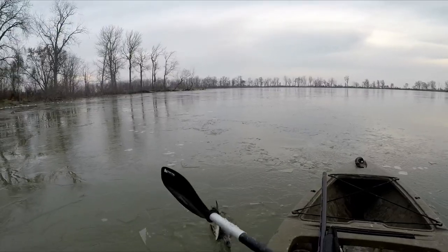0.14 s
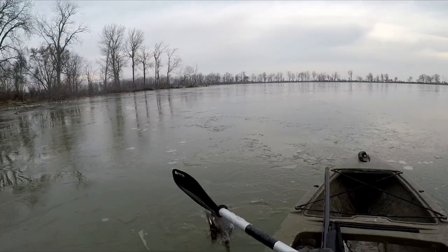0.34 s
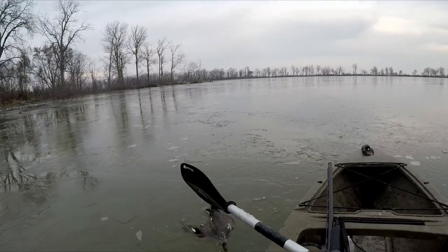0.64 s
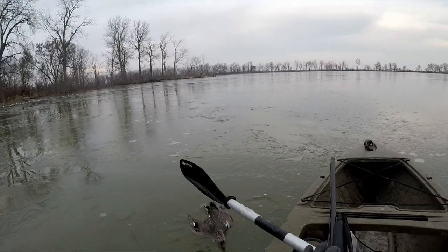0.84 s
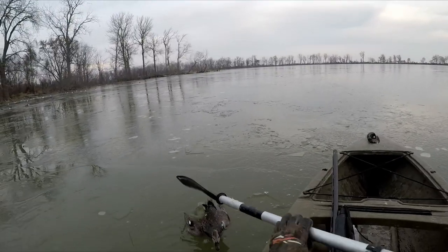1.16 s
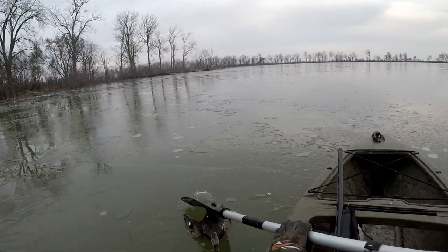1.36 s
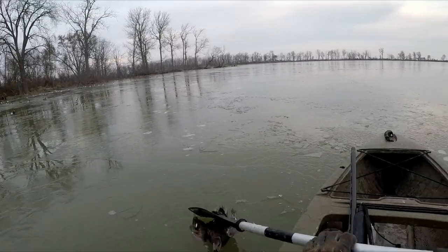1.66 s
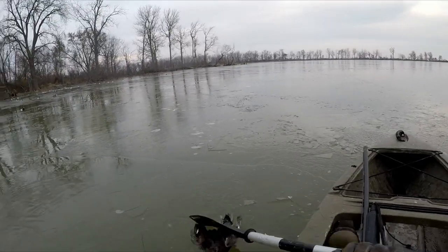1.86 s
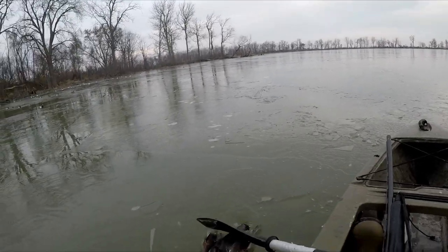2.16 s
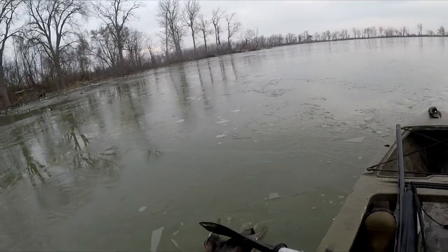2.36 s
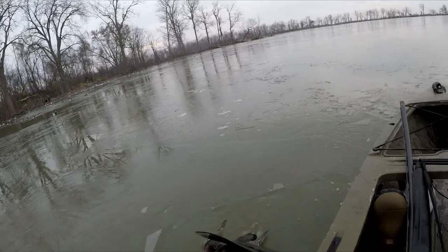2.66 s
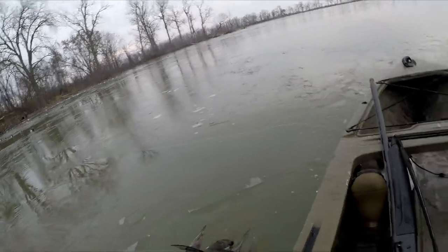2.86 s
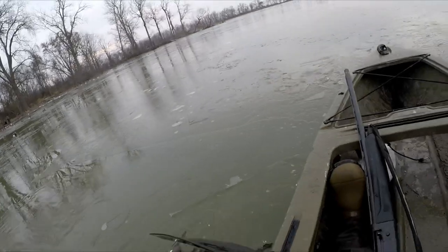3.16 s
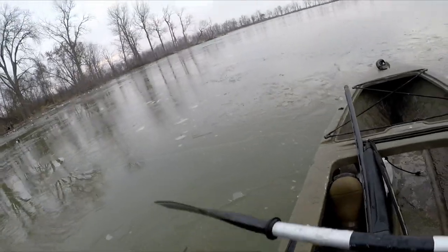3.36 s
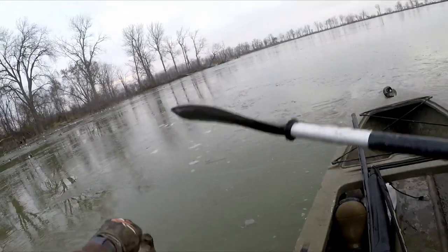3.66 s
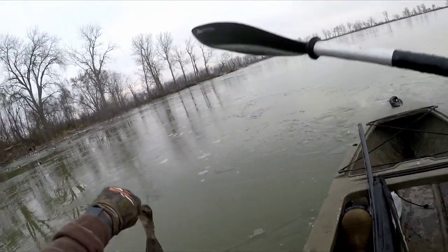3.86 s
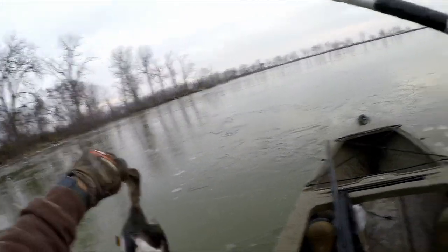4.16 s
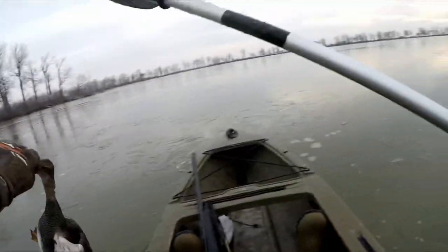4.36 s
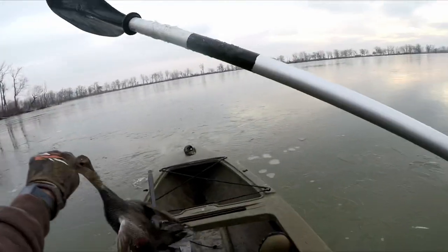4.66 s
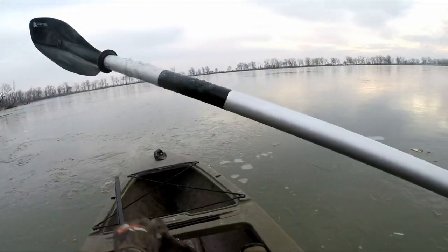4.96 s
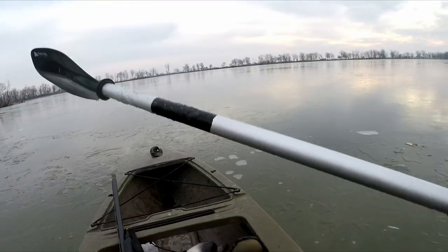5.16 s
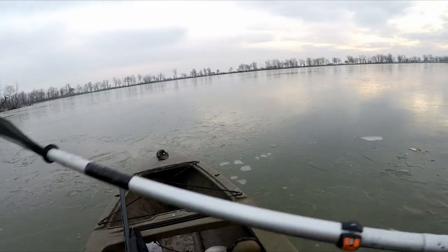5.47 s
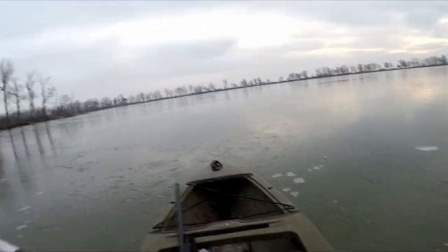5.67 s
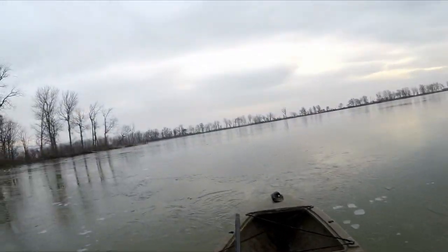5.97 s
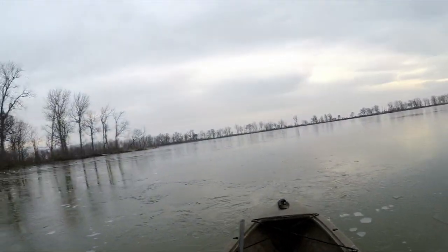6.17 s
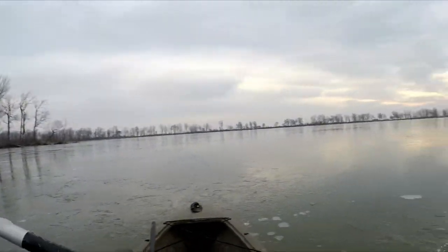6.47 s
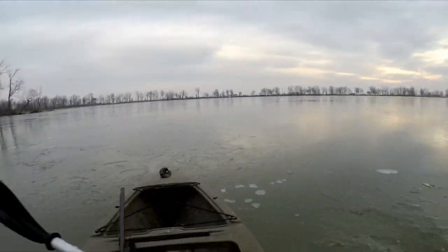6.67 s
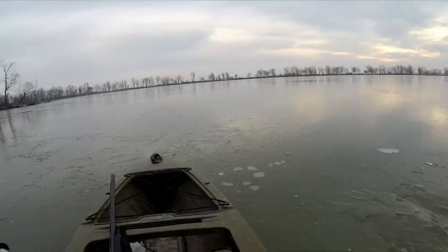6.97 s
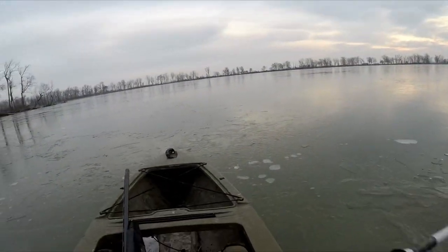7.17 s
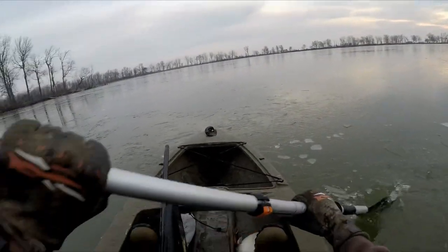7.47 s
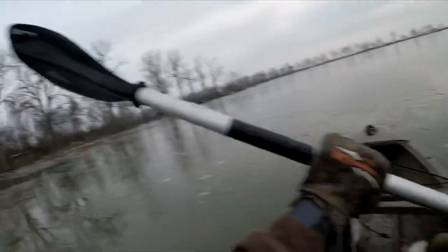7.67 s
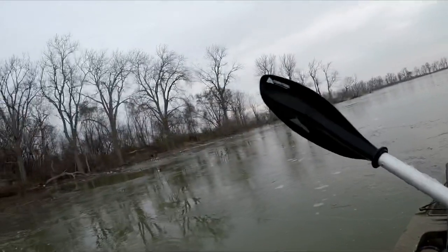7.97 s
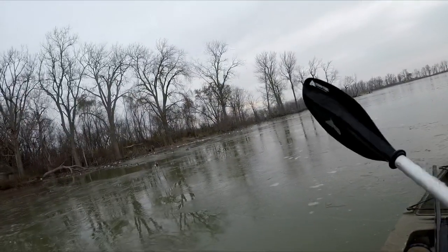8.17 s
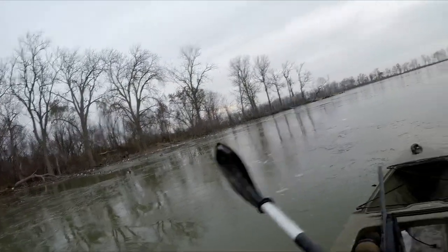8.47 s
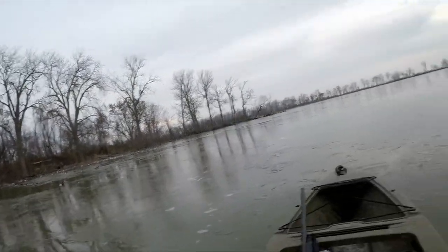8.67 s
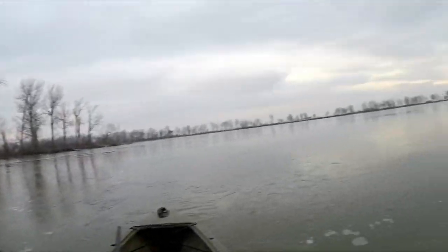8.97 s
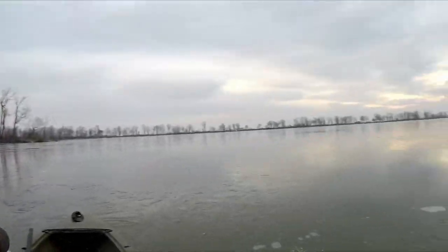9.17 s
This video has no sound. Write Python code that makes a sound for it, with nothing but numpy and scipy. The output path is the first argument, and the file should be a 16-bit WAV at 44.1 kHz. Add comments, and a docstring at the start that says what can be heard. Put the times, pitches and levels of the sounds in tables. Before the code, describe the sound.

On a cold open lake, a plastic kayak drifts through skim ice. Plates knock and grind on its hollow hull, with faint crackle and woody raps. The knocking thins, with one sharp crack and tiny drip notes, until a paddle breaks in with bright, dense crunching and snaps. Knocks then crowd together. Wind rumbles on an on-board stereo microphone, brighter on the right.

```python
"""From the start a plastic kayak drifts through skim ice: plates knock and grind along its drumming hull,
struck modes in two-channel noise, and from 1.3 s edges of ice rap out hollow decaying sines.
After 3.6 s the knocks thin out; near 4.2 s a crack, of filtered noise and a plate's ring, and drop-like notes.
At 6.2 s the paddle breaks in with dense crackle and snaps; more such notes from 7 s, knocks crowd around 8 s.
Wind, lumpy filtered noise, rumbles throughout; the right microphone port is bright, the left one muffled."""
import sys
import numpy as np
from scipy import signal
from scipy.fft import rfft, irfft, next_fast_len
from scipy.io import wavfile
from scipy.ndimage import uniform_filter1d, minimum_filter1d

SR = 44100
rng = np.random.default_rng(int(sys.argv[2]) if len(sys.argv) > 2 else 0)


def unload_wav(signal):
    """Save mono or channel-first audio to the path in sys.argv[1] as 16-bit WAV at rate SR, clipped to [-1, 1]."""
    wavfile.write(
        sys.argv[1],
        SR,
        np.round(np.clip(np.atleast_2d(signal).T, -1, 1) * 32767).astype(np.int16),
    )


N = 411012
HZ = np.fft.rfftfreq(next_fast_len(N + 8192), 1 / SR)

# The modes of the plastic hull: (frequency [Hz], level under the hail [dB], undamped ring time t60 [s])
HULL_MODES = [(90, -1.5, 0.027), (115.7, -3, 0.17), (154.4, 1.5, 0.09), (189.2, 0.5, 0.12),
              (234.2, 1.5, 0.097), (289, -4, 0.11), (337.3, -9.5, 0.087), (396, 3.5, 0.027),
              (498, 0.5, 0.042), (594.8, -1.5, 0.038), (679, -11, 0.038), (793, -25.5, 0.019)]
UPPER_HZ = 385  # modes above this count as upper
# Single plates hitting the hull: (time [s], level [dB], upper modes against it [dB], struck panel [Hz])
KNOCKS = [(0.294, -5, -12, 184), (0.459, -4, -25, 134), (0.51, -6, -33, 155), (1.322, -12, 7, 148),
          (1.353, -10, 1, 282), (1.394, -7, -5, 207), (1.507, -18, 6, 145), (1.589, -23, -2, 292),
          (1.63, -22.5, 13, 290), (1.699, -7, -9, 247), (1.723, -4, 0, 233), (1.898, -3, -22, 242),
          (2.13, -3, -28, 234), (2.423, 2, -28, 190), (2.545, 1.5, -28, 220), (2.803, 1.5, -9, 176),
          (2.841, -1, -5, 235), (3.069, 0, -7, 226), (3.114, 6.5, -8, 228), (3.212, -10, 1, 230),
          (3.24, -13, 2, 159), (3.355, -13, -23, 178), (3.411, -11, -27, 273), (3.46, -14, -27, 209),
          (3.567, -10.5, 0.5, 157), (3.739, -5, -11, 226), (4.178, -18, -14, 164), (4.754, -30, -33, 213),
          (5.097, 1.5, -6, 234), (5.345, 0, -4, 241), (5.768, -21, 15, 286), (6.742, -4, -10, 178),
          (7.444, -16, -6, 270), (7.684, -3, 1, 183), (7.705, -5.5, -25, 203), (7.83, -9, -29, 198),
          (7.874, -2.5, -27, 177), (7.93, -4, -25, 141), (7.971, -9, -25, 111), (7.985, -4, -25, 280),
          (8.006, -1, -25, 124), (8.062, -8, -25, 117), (7.912, -8.5, 3, 154), (8.178, -1, -25, 189),
          (8.193, -17, -2, 259), (8.348, -10, -25, 198), (8.505, -21, -7, 200), (8.547, -8.5, -4, 273),
          (9.15, 3.5, -5, 206)]
CONTACT_S = 0.014  # a plate stays on the hull this long, so that each mode swells before it dies
PANEL_DB_PER_OCTAVE = 28  # modes away from the struck panel ring less
KNOCK_UNEVEN = 0.32  # a hard blow evens out the upper modes: share of their dB pattern left
KNOCK_DAMPING = 0.75  # the plate rests on the hull and shortens its ring to this share
# Changing level of drumming, crackle and crunch under the single events:
# (time [s], lower hull modes [dB], upper hull modes [dB], crackle [dB], crunch [dB])
UNDERLAY = [(0, -19, -30.5, -49.5, -42.5), (.6, -18.5, -26.5, -47.5, -39.5), (1.05, -22.5, -32, -50.5, -45),
            (1.6, -21, -27.5, -48.5, -41.5), (2.5, -16, -30, -49.5, -42.5), (2.95, -20.5, -29, -50, -42.5),
            (3.3, -24, -36, -48.5, -41.5), (3.65, -23.5, -38.5, -49.5, -43), (4.4, -24, -30, -52.5, -46.5),
            (5.0, -21, -28.5, -50.5, -45), (5.5, -24.5, -39, -57, -52), (6.23, -28, -31.5, -54.5, -45.5),
            (6.26, -18.5, -29, -27.5, -32), (6.9, -22.5, -26, -36, -35), (7.4, -26.5, -30, -43.5, -41.5),
            (7.6, -18, -27.5, -39.5, -35), (8.2, -19, -18.5, -37.5, -31.5), (8.95, -16, -26.5, -42, -38),
            (9.32, -29, -16, -35, -30)]
# The hull rides up on a sheet and grinds along it:
# (start [s], hold [s], lower modes [dB], upper modes [dB])
SHOVES = [(.29, 0.11, -17.5, -26), (.45, 0.14, -15.5, -35), (.7, 0.073, -15, -23.5),
          (1.2, 0.037, -13.5, -26), (1.32, 0.17, -27, -28), (1.49, 0.18, -39, -26), (1.69, 0.11, -15, -37),
          (1.89, 0.027, -16, -22.5), (2.0, 0.17, -16, -25), (2.33, 0.15, -16, -25.5),
          (2.55, 0.19, -10, -24), (2.79, 0.082, -15.5, -29), (3.05, .27, -11, -25),
          (3.43, 0.099, -17, -30.5), (3.72, 0.11, -22, -37), (3.86, 0.1, -12.5, -37),
          (4.17, 0.034, -16, -43), (5.15, 0.087, -12.5, -29.5), (6.08, 0.031, -24, -45),
          (6.255, 0.32, -21, -21.5), (6.46, .16, -17, -17), (6.64, 0.064, -26, -26),
          (6.73, 0.034, -15, -27), (6.77, 0.033, -11.5, -23), (6.91, 0.077, -36, -29.5),
          (7.455, 0.12, -19.5, -24), (7.683, 0.025, -11, -19.5), (7.8, 0.12, -10, -21.5),
          (7.94, 0.17, -10, -20.5), (8.17, 0.22, -14, -32), (8.5, 0.17, -16, -35), (8.85, 0.16, -13, -28),
          (9.05, 0.38, -11, -23.5)]
SHOVE_ATTACK_S, SHOVE_T60_S = 0.012, 0.29
SWELL_SHARE, SWELL_MOST_S = .4, .035  # a run's attack is longer by this share of its hold, up to a limit

# The struck panel's own thump starts sharp by PANEL_SAG, a share of its pitch, and settles
PANEL_DB, PANEL_SAG, PANEL_SAG_S, PANEL_T60_S = -5.5, 0.11, 0.0068, 0.058
PANEL_HOLD_S = 0.011  # the plate presses on this long before the thump dies
# Edges of ice rap a small panel, which rings hollow: (time [s], level [dB], pitch [Hz], t60 [s])
RAPS = [(1.322, -16, 664, 0.064), (1.357, -12, 670, 0.1), (1.395, -21, 600, .06), (1.509, -15.5, 507, 0.13),
        (1.547, -14, 560, 0.057), (1.6, -13.5, 549, 0.18), (1.612, -18.5, 790, .04), (1.64, -17, 511, .12),
        (1.699, -12, 502, 0.1), (1.715, -14, 605, 0.18), (2.804, -8.5, 594, 0.053),
        (2.842, -20, 614, 0.076), (3.212, -23, 446, .07), (3.238, -16.5, 673, 0.09), (5.062, -26, 597, .09),
        (5.098, -9, 554, 0.041), (5.185, -13.5, 461, 0.21), (5.342, -16, 750, 0.053), (5.35, -17, 605, 0.1),
        (5.385, -22, 520, 0.054), (6.298, -24, 606, .06), (6.415, -10.5, 510, .07), (6.48, -21, 600, .07),
        (6.52, -14, 565, 0.087), (6.555, -22, 527, 0.061), (6.59, -7, 546, .1), (6.745, -21, 630, .07),
        (6.95, -16, 494, .06), (7.48, -13, 543, 0.035), (7.575, -21, 520, .07), (7.697, -14, 593, 0.043),
        (7.913, -11, 530, 0.11), (8.16, -16, 510, 0.079), (8.195, -15, 470, .08), (8.506, -20, 600, .06),
        (8.546, -19, 610, 0.051), (9.151, -27, 552, 0.063)]
RAP_RISE_S = 0.0013

# Runs of fractures; the long loud ones are the paddle breaking in:
# (start [s], hold [s], crackle [dB], crunch [dB])
BREAKS = [(.05, 0.04, -42.5, -35.5), (.33, 0.082, -49, -39.5), (.52, 0.027, -48, -49),
          (1.17, 0.059, -51, -42), (1.265, 0.014, -47, -52), (1.32, 0.0074, -34, -42),
          (1.35, 0.0045, -33, -44), (1.48, 0.067, -45.5, -39), (1.57, 0.07, -47.5, -37.5),
          (1.69, 0.033, -41, -32), (1.77, 0.026, -42.5, -37), (1.885, 0.039, -40.5, -34),
          (2.0, 0.15, -46, -38), (2.32, 0.093, -52, -40), (2.45, 0.092, -43.5, -38),
          (2.54, 0.095, -37, -34), (2.655, 0.081, -40.5, -33.5), (2.75, 0.12, -44, -39.5),
          (3.04, 0.032, -42, -33), (3.09, 0.087, -38.5, -34), (3.2, 0.092, -37, -31),
          (3.39, 0.023, -43, -43), (3.447, 0.074, -43, -37.5), (3.86, 0.081, -45.5, -39.5),
          (4.177, 0.0058, -43, -21.5), (4.22, 0.041, -46, -48), (4.285, .012, -46, -39),
          (4.32, 0.029, -50, -40), (4.525, 0.0056, -63, -36.5), (4.6, 0.014, -63, -41),
          (5.04, 0.067, -46, -38), (5.16, 0.058, -46, -36.5), (5.29, 0.046, -48.5, -48),
          (5.345, 0.0091, -58, -40), (5.765, 0.021, -43.5, -46), (6.05, 0.036, -49.5, -49),
          (6.241, 0.014, -19.5, -20.5), (6.265, 0.36, -24, -22), (6.63, 0.054, -51, -32),
          (6.68, 0.18, -28.5, -31), (6.73, 0.029, -29, -38), (6.89, .13, -33.5, -38),
          (7.03, 0.039, -37, -31), (7.22, 0.013, -51, -36), (7.443, 0.016, -26, -20.5),
          (7.465, 0.038, -34.5, -26), (7.5, 0.073, -37, -36), (7.565, 0.024, -50, -32.5),
          (7.69, 0.0088, -40, -29), (7.74, 0.052, -38, -33), (7.8, 0.048, -34.5, -31.5),
          (7.9, 0.25, -36, -31.5), (8.25, 0.042, -38, -36), (8.33, 0.021, -40, -34),
          (8.42, 0.018, -54, -36), (8.5, 0.037, -41, -49), (8.6, 0.11, -38, -36), (8.76, 0.07, -41, -38),
          (8.86, 0.034, -55, -37), (8.996, 0.0077, -30, -28), (9.02, 0.028, -30, -36),
          (9.055, 0.14, -32, -27), (9.2, 0.069, -38.5, -39)]
BREAK_ATTACK_S, BREAK_T60_S = 0.00076, 0.071
# Colour of the bright crackle: (frequency [Hz], level per Hz [dB])
CRACKLE_COLOUR = [(1300, -1.5), (2200, -23), (2600, -10), (3400, -7), (4200, -11), (5000, -9.5),
                  (6200, -7.5), (7000, -6.5), (7600, -4.5), (8400, -9), (10000, -14), (12100, -23.5),
                  (14200, -30), (15500, -42)]
# Colour of the duller crunch: (frequency [Hz], level per Hz [dB])
CRUNCH_COLOUR = [(400, -36), (700, 9), (1000, 10), (1500, 6), (2000, -1), (2800, -7.5), (4000, -43.5)]
QUIET_DB = -50  # a quiet crackle, from which its growth is counted
HISS_GROWTH = -.02  # dB of hiss per dB of growth: loud breaking is a little grainier
TOP_HZ, TOP_FROM_DB = 10500, 9  # beyond this growth the crackle's top band grows less than the rest
TOP_DB, TOP_LOSS = 3.5, 0.92  # gain of the top band in a quiet crackle; dB lost per dB of further growth
GURGLE_DB, GURGLE_GROWTH = -10.5, .3  # bubbles against a quiet crunch; dB gained per dB of growth

# Single cracks: (time [s], level [dB], crunch against it [dB], plate pitch [Hz], edge against it [dB])
SNAPS = [(0.0643, -44, -17, 1410, -20), (0.3436, -31, -23, 1060, -25), (0.543, -26, -18, 1360, -27),
         (1.003, -36, -10, 1300, -8), (1.1, -31.5, -10, 910, -16), (1.1888, -29.5, -11, 1100, -21),
         (1.267, -33, -8, 910, -25), (1.3205, -25, -4, 1740, -10), (1.3523, -24.5, -1, 1474, -11),
         (1.3618, -45, -1, 1600, -12), (1.435, -49, 11, 1120, 1), (1.5204, -31, -19, 910, -10),
         (1.695, -35, -2, 1380, -9), (1.719, -31.5, -2, 1405, -21), (2.0076, -23.5, -6, 1100, -16),
         (2.0408, -22.5, -9.5, 1450, -27), (2.0615, -30, -13, 1100, -25), (2.225, -33, -6, 1000, -20),
         (2.301, -40, -19, 1000, -18), (2.378, -35, -18, 1000, -22), (2.4199, -32.5, -11, 1000, -20),
         (2.46, -30, -18, 1000, -25), (2.5735, -38, -10, 894, -22), (2.5888, -21, -17, 1460, -28),
         (2.6567, -26, -11, 996, -23), (2.782, -33, -14, 1090, -12), (2.948, -44, -14, 1010, -22),
         (3.0944, -29, -16, 1160, -19), (3.1069, -26, 0, 1070, -26), (3.2135, -26, -11, 1290, -27),
         (3.261, -32, -3, 991, -26), (3.333, -32, -8, 1000, -20), (3.352, -33, -16, 1100, -24),
         (3.391, -44, -14, 1200, -24), (3.464, -23.5, -10.5, 1410, -19), (3.497, -25, -10, 1030, -20),
         (3.87, -32, -3, 1430, -13), (4.176, -14.5, -19, 1350, -11), (4.526, -46, -12, 2200, 2),
         (4.8208, -40.5, -3, 925, -9), (5.071, -30, -14, 1060, -10), (5.1621, -26, -24, 1050, -17),
         (5.4923, -47, -6, 950, -1.5), (5.768, -30, -5, 1060, -26), (5.922, -36.5, -15, 930, -25),
         (6.2402, -8, -11.5, 1290, -14), (6.2957, -11, -6.5, 1150, -26), (6.341, -11, -17, 1000, -26),
         (6.386, -11, -17, 950, -29), (6.405, -19, -18, 1100, -26), (6.4435, -14, -9, 964, -28),
         (6.54, -13, -16, 1080, -25), (6.575, -6, -20, 925, -22), (6.694, -11, -20, 1140, -35),
         (6.724, -19, -14, 1030, -28), (6.733, -25, -6, 870, -22), (6.746, -18.5, -2.5, 970, -24),
         (6.77, -14, -18, 1180, -25), (6.8578, -7.5, -38, 1430, -38), (6.8934, -23, -27, 902, -17),
         (6.921, -19, -16, 1550, -23), (6.945, -16.5, -13, 1390, -27), (6.968, -17.5, -28, 1250, -34),
         (7.08, -23, -27, 982, -29), (7.1501, -25, -10, 880, -27), (7.178, -28, -20, 1000, -27),
         (7.204, -27, -20, 1000, -27), (7.2204, -18.5, -16, 1100, -37), (7.442, -10, -17.5, 1880, -14),
         (7.753, -20, -18, 990, -15), (7.8133, -14, -16, 940, -33), (7.961, -23, -9, 1010, -26),
         (8.0251, -17, -6.5, 906, -29), (8.077, -14.5, -13, 940, -23), (8.2684, -19.5, -7.5, 1030, -31),
         (8.434, -27, -25, 1000, -25), (8.5083, -10, -34, 966, -27), (8.6864, -28, -13, 1010, -22),
         (8.727, -21, -20, 900, -26), (8.769, -26, -14, 960, -21), (8.9945, -8.5, -18.5, 1310, -19),
         (9.026, -15, -9, 970, -23), (9.0478, -30, -10, 1550, -6), (9.0676, -22, -5, 1040, -11),
         (9.115, -9, -28, 1020, -23), (9.154, -24, -9, 880, -19)]
# Colour of the tick and its tail: (frequency [Hz], level per Hz [dB])
SNAP_COLOUR = [(3000, -73), (4800, -16.5), (7500, -4.5), (10000, -13), (12500, -30), (15000, -27)]
# Colour of the duller body of a crack: (frequency [Hz], level per Hz [dB])
BODY_COLOUR = [(300, -9), (600, 11.5), (1000, 0.5), (1700, -3.5), (2400, -8), (3600, -31), (8000, -53)]
# Colour of the edge of a crack: (frequency [Hz], level per Hz [dB])
EDGE_COLOUR = [(900, -55), (1500, 5), (2600, -3), (3600, -5), (4500, -5), (6500, -22), (12000, -46)]
SNAP_T60_S, SNAP_RISE_S = 0.014, 0.0017
EDGE_LASTS, PLATE_LASTS = 1.16, 2.65  # edge and plate ring last this many times the noisy tail
SNAP_EDGE_DB = 23
CLICK_DB = 12.5  # the first instant of a crack against its noisy tail
OVERTONE, OVERTONE_DB = 2.3, -21.5  # second mode of a plate: frequency ratio and level
# The cleanest splits also give a bare, very high click: (time [s], level before PING_DB [dB])
PINGS = [(1.3218, -32), (1.3512, -34), (4.1758, -35), (6.2401, -31), (6.8562, -26), (7.2209, -31),
         (7.4425, -26), (8.4332, -37), (8.5065, -32), (8.9939, -29), (9.1142, -16)]
PING_HZ, PING_DB = 10000, 9

# Short decaying notes, some rising in pitch, like drops and bubbles:
# (time [s], level [dB], start pitch [Hz], rise [octaves], t60 [s])
DROP_NOTES = [(4.122, -38, 2840, 1.3, 0.017), (4.259, -27, 5900, .1, 0.01), (4.355, -22, 7360, .1, 0.0064),
              (4.526, -19, 1310, .05, 0.018), (7.01, -21, 1500, .1, .04), (7.012, -18, 870, .05, .04),
              (7.064, -24, 1800, .1, .03), (7.068, -28, 1300, .05, .04), (7.466, -24, 1300, .1, 0.04),
              (7.478, -19, 1320, .05, .035), (7.485, -11.5, 1030, 0.05, 0.033),
              (7.575, -24, 1510, .1, 0.036), (7.729, -23, 1740, .2, .03), (7.731, -25, 2530, .1, 0.028),
              (7.736, -20, 2170, .15, 0.032), (7.74, -27, 2420, .1, 0.024)]
# Gusts on the ports: (time [s], rumble [dB])
WIND = [(0.0, -18.5), (0.1, -17.5), (0.21, -30), (0.26, -19), (0.98, -15), (2.65, -22.5), (3.27, -13.5),
        (3.32, -24), (3.6, -12), (3.63, -16), (5.06, -12), (5.14, -17), (5.19, -17), (6.02, -10),
        (6.85, -15), (7.24, -16.5), (7.27, -10), (7.94, -23.5), (8.18, -11), (8.77, -28.5), (8.95, -12),
        (9.32, -25)]
# Colour of the wind rumble: (frequency [Hz], level per Hz [dB])
WIND_COLOUR = [(15, -1), (28, -1.5), (45, -3), (70, -3.5), (100, -9), (200, -19.5), (500, -34),
               (1500, -69.5), (5000, -79.5)]

# Tone of the two ports: (frequency [Hz], left minus right [dB])
PORTS = [(30, 0.4), (140, -1.5), (320, -1.5), (500, -5.5), (720, -8), (1050, -2), (1700, -5.5),
         (2600, -0.5), (3900, -2), (4800, -11), (5500, -15), (7700, -25), (9300, -17), (12000, -18),
         (15000, -22)]
# Phase between the ports: (frequency [Hz], lead of the left port [radians])
LEAD = [(0, 0), (350, -.25), (520, 0), (850, 2.0), (1100, 2.3), (2700, 2.55), (3500, 1.0), (4500, 1.1),
        (5000, 3.1), (7000, 0), (9000, -3.1), (11000, -9), (14000, -16)]
# Likeness of the ports: (frequency [Hz], likeness [0-1])
ALIKE = [(30, .985), (100, .955), (300, .93), (500, .96), (1100, .97), (1700, .89), (2600, .79), (3900, .5),
         (5500, .62), (7700, .2), (9300, .5), (12000, .2)]
CUTOFF_HZ = 15800
LIMIT_DB, RELEASE_DB_PER_S = -1, 50


def hull():
    """A hail of plates and single large ones strike the hull modes, each with new strengths."""
    drum_gain, upper_gain = swells(SHOVES, SHOVE_ATTACK_S, SHOVE_T60_S, in_time(UNDERLAY)[:2])
    hail = grains(500.0, spread_db=2.0, clump_db=1.0, clump_rate=22.0)
    s, level_db, knock_upper_db, panel_hz = np.transpose(KNOCKS)
    touch = np.arange(int(CONTACT_S * SR))
    at = (s * SR).astype(int)[:, None] + touch
    push = np.exp(-3 * touch / len(touch))
    lower, upper, knocks = np.zeros((3, 2, N))
    for hz, mode_db, t60 in HULL_MODES:
        drumming = from_db(mode_db) * ring(hail * rng.standard_normal((2, N)), hz, t60)
        start = rng.normal(0, .6, (len(at), 1))  # phases: the modes start nearly together
        strength = from_db(level_db + rng.normal(0, 1.0, (len(at), 2)).T)[..., None]
        blow = strength * 2 * push / push.sum() * np.cos(2 * np.pi * hz * touch / SR + start)
        if hz > UPPER_HZ:
            upper += drumming
            # the upper modes take mostly the first of the contact
            blow *= from_db(knock_upper_db + KNOCK_UNEVEN * mode_db - 0.5)[:, None] * push
        else:
            lower += drumming
            # modes near the struck panel ring most
            octaves_off = np.abs(np.log2(hz / panel_hz))
            blow *= from_db(-9.5 - PANEL_DB_PER_OCTAVE * octaves_off)[:, None]
        blows = np.zeros((2, N))
        blows[:, at] = blow
        knocks += ring(blows, hz, KNOCK_DAMPING * t60)
    grind = drum_gain * evened(lower, 0.084, 0.36) + upper_gain * evened(upper, 0.013, 0.14)
    soft = signal.butter(4, 1000.0, fs=SR, output="sos")  # wet ice on plastic is a soft contact
    return signal.sosfilt(soft, grind + knocks)


def thumps():
    """The panel under each blow rings at its own pitch, which sags as the hull springs back."""
    out, after = np.zeros(N + SR), np.arange(SR // 6) / SR
    for s, level_db, _, panel_hz in KNOCKS:
        pitch = panel_hz * (1 + PANEL_SAG * np.exp(-after / PANEL_SAG_S))
        fall_db = 60 * np.maximum(after - PANEL_HOLD_S, 0) / PANEL_T60_S
        envelope = from_db(level_db + PANEL_DB - fall_db) * np.minimum(after / 0.0046, 1)
        i = int(s * SR)
        out[i:i + len(after)] += envelope * np.sin(2 * np.pi * np.cumsum(pitch) / SR)
    return out[:N]


def raps():
    """An edge of ice on a small panel: one short hollow note, a decaying sine."""
    out, after = np.zeros(N + SR), np.arange(SR // 6) / SR
    for s, level_db, hz, t60 in RAPS:
        envelope = from_db(level_db - 60 * after / t60) * np.minimum(after / RAP_RISE_S, 1)
        i = int(s * SR)
        out[i:i + len(after)] += envelope * np.sin(2 * np.pi * hz * after)
    return out[:N]


def ice():
    """Every fracture is a short noise burst and a ring, heard as a bright crackle and a duller, longer crunch."""
    crackle_gain, crunch_gain = swells(BREAKS, BREAK_ATTACK_S, BREAK_T60_S, in_time(UNDERLAY)[2:])
    white = rng.standard_normal((2, 2, N))
    fractures = grains(600.0, spread_db=2.5, clump_db=1.5, clump_rate=19.0)
    growth_db = 20 * np.log10(uniform_filter1d(crackle_gain, size=SR // 5)) - QUIET_DB
    hiss = 2.6 * from_db(HISS_GROWTH * growth_db)  # far and tiny fractures merge

    bursts = evened(white[0] * (hiss + dying(fractures, 0.021)), 0.092, 0.92)
    tinkle = rms_one(shards(fractures, 3000.0, 13100.0, cycles=27.0, tilt=-2.8))
    tinkle_gain = from_db(-10.0 + 0.05 * growth_db)
    crackle = rms_one(colour(bursts + tinkle_gain * tinkle, CRACKLE_COLOUR))
    top = signal.sosfilt(signal.butter(4, TOP_HZ, "high", fs=SR, output="sos"), crackle)
    rest = signal.sosfilt(signal.butter(4, TOP_HZ, fs=SR, output="sos"), crackle)
    top_db = TOP_DB - TOP_LOSS * np.maximum(growth_db - TOP_FROM_DB, 0)
    crackle = rest + from_db(top_db) * top

    crunch = evened(colour(white[1] * (hiss + dying(fractures, 0.041)), CRUNCH_COLOUR), 0.1, 0.65)
    clink = rms_one(shards(fractures, 700.0, 2730.0, cycles=11.0, tilt=0.88))
    # air trapped as water wells up between the pieces
    pockets = grains(150.0, spread_db=3.5, clump_db=4.0, clump_rate=12.0)
    bubbles = rms_one(shards(pockets, 410.0, 1230.0, cycles=11.0, tilt=1.8))
    gurgle = from_db(GURGLE_DB + GURGLE_GROWTH * growth_db) * bubbles
    return crackle_gain * crackle + crunch_gain * (crunch + from_db(-5.5) * clink + gurgle)


def snaps():
    """A sharp tick with a noisy tail and edge, a duller crunch and the brief ring of the plate that split."""
    white = rng.standard_normal((2, 2, N))
    tails, clicks, edges, bodies, plates = np.zeros((5, N))
    time = np.arange(SR // 10) / SR
    for s, level_db, crunch_db, hz, edge_db in SNAPS:
        i = int(s * SR)
        after = time[:N - i]
        span = slice(i, i + len(after))
        rise = np.minimum(after / SNAP_RISE_S, 1)
        fall_db = 60 * after / SNAP_T60_S
        tails[span] += from_db(level_db - fall_db)
        clicks[i] = from_db(level_db + CLICK_DB)
        edges[span] += rise * from_db(level_db + edge_db - fall_db / EDGE_LASTS)
        bodies[span] += rise * from_db(level_db + crunch_db - fall_db / 4.8)
        note = np.sin(2 * np.pi * hz * after)
        note += from_db(OVERTONE_DB) * np.sin(2 * np.pi * OVERTONE * hz * after)
        plates[span] += rise * from_db(level_db + crunch_db - fall_db / PLATE_LASTS) * note
    tick = from_db(9.5) * colour(white[0] * tails + clicks, SNAP_COLOUR)
    edge = from_db(SNAP_EDGE_DB) * colour(white[1] * edges, EDGE_COLOUR)
    body = from_db(16.0) * colour(white[0] * bodies, BODY_COLOUR)
    return tick + edge + body + from_db(12.0) * plates


def pings():
    """The cleanest splits: single clicks with only their top left."""
    clicks = np.zeros(N)
    s, level_db = np.transpose(PINGS)
    clicks[(s * SR).astype(int)] = from_db(level_db + PING_DB)
    return signal.sosfilt(signal.butter(2, PING_HZ, "high", fs=SR, output="sos"), clicks + 1e-18)


def drop_notes():
    """Short decaying sines, some rising in pitch, like drops and bubbles."""
    out, after = np.zeros(N), np.arange(SR // 16) / SR
    for s, level_db, hz, rise, t60 in DROP_NOTES:
        pitch = hz * 2 ** (rise * np.minimum(after / t60 * 2, 1))
        envelope = from_db(level_db - 60 * after / t60) * np.minimum(after / 0.0011, 1)
        i = int(s * SR)
        out[i:i + len(after)] += envelope * np.sin(2 * np.pi * np.cumsum(pitch) / SR)
    return out


def wind():
    """Lumpy turbulence on the ports: low noise, separate in each channel, under a curve of gusts."""
    rumble_db, = in_time(WIND)
    lumps = from_db(0.58 * drift(5.5))
    turbulence = lumps * colour(rng.standard_normal((2, N)), WIND_COLOUR)
    return from_db(rumble_db) * evened(turbulence, 0.053, 0.16)


def shards(fractures, low_hz, high_hz, cycles, tilt):
    """Loose pieces of ten sizes: each fracture rings one of them per channel for a few cycles."""
    pitches = np.geomspace(low_hz, high_hz, 10)
    dealt = rng.integers(0, 10, (2, N))
    return sum(ring(fractures * (dealt == k), hz, cycles / hz) * (low_hz / hz) ** tilt
               for k, hz in enumerate(pitches))


def grains(per_s, spread_db, clump_db, clump_rate):
    """Random clicks, many small and few large, that come in clumps."""
    born = rng.random(N) < per_s * from_db(clump_db * drift(clump_rate)) / SR
    return born * from_db(spread_db * np.minimum(rng.exponential(1, N), 4))


def swells(rows, attack_s, t60, under_db):
    """Attack, hold, release for each row, its power added to the level underneath; gains for two layers."""
    power, time = from_db(under_db) ** 2, np.arange(N) / SR
    for start, hold, *db in rows:
        swell = min(SWELL_SHARE * hold, SWELL_MOST_S)
        i, j = int((start - swell / 2) * SR), int((start + hold + t60) * SR)
        after = time[i:j] - start
        attack = np.clip((after + swell / 2) / (attack_s + swell), 0, 1)
        release = from_db(-60 * np.maximum(after - hold, 0) / t60)
        power[:, i:j] += (from_db(db)[:, None] * attack * release) ** 2
    return np.sqrt(power)


def ring(clicks, hz, t60):
    """Two-pole resonator: a unit click sets a decaying sine of height 1 ringing."""
    r, w = from_db(-60 / (t60 * SR)), 2 * np.pi * hz / SR
    return signal.lfilter([0, np.sin(w)], [1, -2 * r * np.cos(w), r * r], clicks + 1e-18)


def dying(clicks, t60):
    """Each click leaves an envelope that falls 60 dB in t60."""
    return signal.lfilter([1], [1, -from_db(-60 / (t60 * SR))], clicks + 1e-18)


def evened(x, seconds, share):
    """Takes a share of the chance swells out, so that the level follows its curve; rms 1."""
    power = uniform_filter1d(np.mean(x ** 2, axis=0), size=int(seconds * SR)) + 1e-12
    return rms_one(x / power ** (share / 2))


def drift(rate):
    """Slow chance of rms 1: noise twice through a one-pole low-pass at rate [Hz], on every 40th sample."""
    r = np.exp(-80 * np.pi * rate / SR)
    slow = signal.lfilter([1], [1, -2 * r, r * r], rng.standard_normal(N // 40 + 2002))[2000:]
    return np.interp(np.arange(N) / 40, np.arange(len(slow)), rms_one(slow))


def colour(x, spectrum):
    """Minimum-phase filter through its cepstrum, so that nothing sounds before its click."""
    size = 2 * (len(HZ) - 1)
    cepstrum = irfft(np.log(from_db(at_hz(spectrum))), size)
    cepstrum[1:size // 2] *= 2
    cepstrum[size // 2 + 1:] = 0
    return irfft(rfft(x, size) * np.exp(rfft(cepstrum)), size)[..., :N]


def at_hz(points):
    """Reads a curve at every frequency bin, straight on a log frequency axis."""
    hz, value = np.transpose(points)
    return np.interp(np.log(HZ + 1), np.log(hz), value)


def in_time(rows):
    """Draws each column of a table as a curve over the samples."""
    s, *columns = np.transpose(rows)
    return [np.interp(np.arange(N) / SR, s, c) for c in columns]


def from_db(db):
    """Decibels to amplitude."""
    return 10 ** (np.asarray(db) / 20)


def rms_one(x):
    """Scales a signal to rms 1."""
    return x / np.sqrt(np.mean(x ** 2) + 1e-20)


def limiter(sound):
    """The gain drops just ahead of a peak over the limit and recovers slowly."""
    ahead = 128  # samples
    over_db = np.maximum(20 * np.log10(np.abs(sound).max(axis=0) + 1e-9) - LIMIT_DB, 0)
    ramp = RELEASE_DB_PER_S * np.arange(N) / SR
    held = np.maximum.accumulate(over_db + ramp) - ramp
    held = -minimum_filter1d(-held, size=2 * ahead + 1)
    return sound * from_db(-uniform_filter1d(held, size=ahead))


def scene():
    """All layers in two channels that share event times; the noise and the mode strengths differ."""
    return hull() + thumps() + raps() + ice() + snaps() + pings() + drop_notes() + wind()


def record(dry):
    """The left port hears a duller, phase-shifted, partly unlike version; peaks are limited, the top is cut."""
    size = 2 * (len(HZ) - 1)
    near, other = rfft(dry, size)
    left, alike = from_db(at_hz(PORTS)), at_hz(ALIKE)
    turn = np.exp(1j * np.interp(HZ, *np.transpose(LEAD)))
    left_port = left * turn * (alike * near + np.sqrt(1 - alike ** 2) * other)
    pair = np.array([left_port, near]) * 2 / (1 + left)  # the two port gains average 1
    sound = irfft(pair, size)[:, :N]
    sound = limiter(signal.lfilter([1, -1], [1, -.9985], sound))  # the lowest rumble is cut first
    return signal.sosfilt(signal.cheby2(12, 70, CUTOFF_HZ, fs=SR, output="sos"), sound)


dry = scene()
out = record(dry)
unload_wav(out)
```